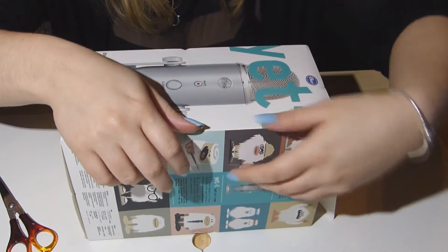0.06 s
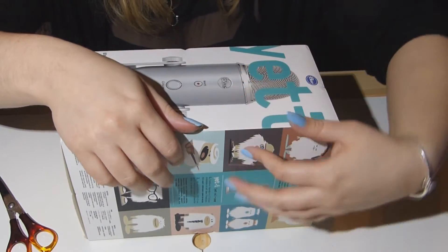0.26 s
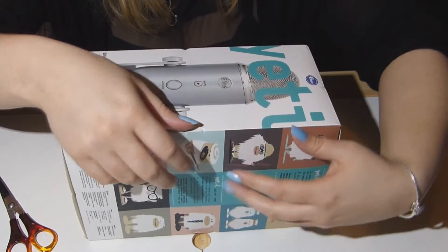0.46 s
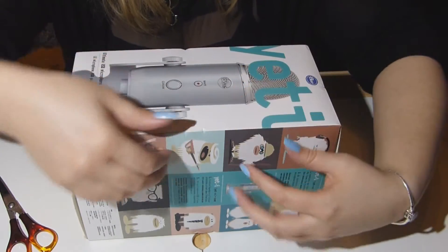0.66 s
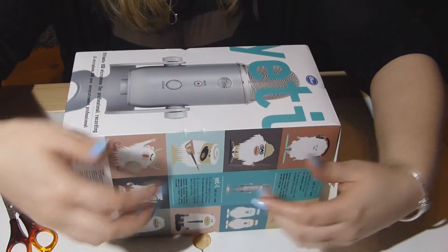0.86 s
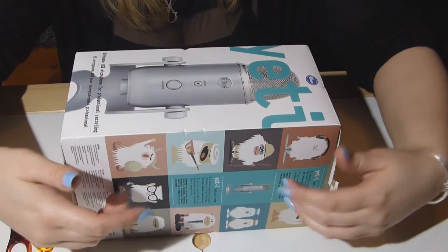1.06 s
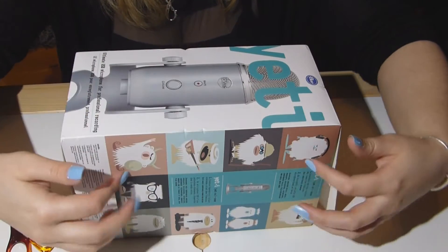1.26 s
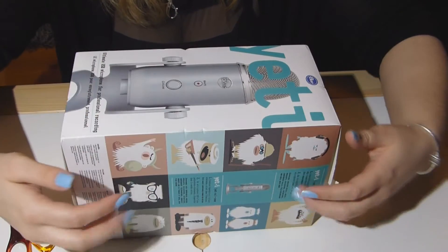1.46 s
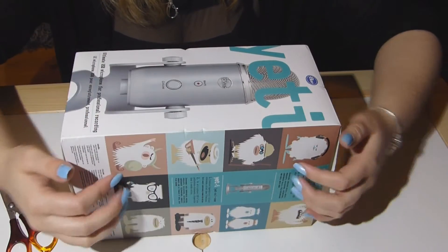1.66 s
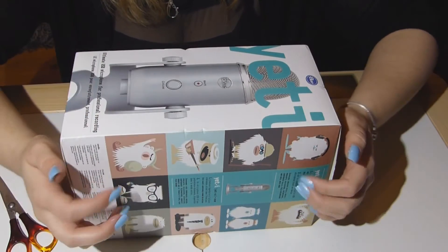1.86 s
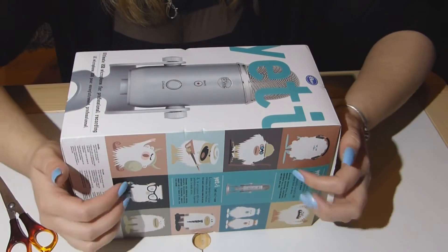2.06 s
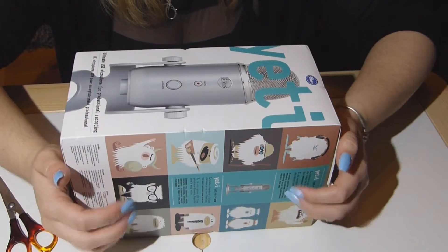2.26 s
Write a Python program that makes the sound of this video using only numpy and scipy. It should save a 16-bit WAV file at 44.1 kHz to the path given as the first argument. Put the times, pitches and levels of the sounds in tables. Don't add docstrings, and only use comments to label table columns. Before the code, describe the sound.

Long fingernails tap sharp, irregular clicks on a filled cardboard box in a quiet room

```python
import sys
import numpy as np
from scipy import signal
from scipy.fft import rfft, irfft, next_fast_len
from scipy.io import wavfile
from scipy.ndimage import uniform_filter1d

SR = 44100
rng = np.random.default_rng(int(sys.argv[2]) if len(sys.argv) > 2 else 0)


def inscribe(sig):
    pcm = np.round(np.clip(np.atleast_2d(sig).T, -1, 1) * 32767)
    wavfile.write(sys.argv[1], SR, pcm.astype(np.int16))


def invert_db(x):
    u = np.asarray(x, float) / 20
    return 10 ** u


N = 102488

# start in seconds, peak level in dB, hollow level in dB,
# panel level in dB, hollow pitch in Hz.
FIRST_TAPS = [
    (0.014, -26, -21, -12.5, 358),
    (0.034, -17.5, -26.5, -16, 295),
    (0.244, -26.5, -27.5, -12, 327),
    (0.25, -16.5, -30, -15.5, 292),
    (0.452, -33, -14, -6, 245),
    (0.501, -40.5, -25, -17, 234),
    (0.516, -20.5, -32, -15.5, 357),
    (0.58, -19.5, -23.5, -17.5, 264),
    (0.665, -23.5, -24, -13.5, 310),
    (0.682, -23, -32, -13, 298),
]
SECOND_TAPS = [(1.08, -31.5, -22.5, -14, 362), (1.174, -24.5, -22.5, -10.5, 307),
               (1.297, -17.5, -26, -15.5, 297), (1.432, -29, -22.5, -19, 351), (1.494, -19, -26, -14, 376),
               (1.605, -42, -15, -13, 362), (1.632, -31.5, -16.5, -10.5, 362),
               (1.684, -17, -23.5, -17.5, 371), (1.716, -15.5, -25.5, -19.5, 363),
               (1.868, -46, -24, -38, 275), (1.91, -24.5, -28.5, -18, 336), (1.981, -19, -23.5, -19, 334),
               (2.091, -20, -25.5, -14, 414), (2.112, -20, -25.5, -18, 367),
               (2.148, -18.5, -24.5, -13.5, 274), (2.278, -44.5, -34, -10, 343),
               (2.305, -25.5, -26.5, -16, 330)]
# start in seconds, length in seconds, level in dB, share of nail from 0 to 1.
SCUFF_STROKES = [(0, 0.016, -50, 0.7), (0.196, 0.085, -61, 0.66), (0.395, 0.022, -63, 0.54),
                 (0.679, 0.047, -49.5, 0.69), (0.732, 0.077, -57.5, 0.55), (0.784, .016, -52.5, 0.98),
                 (1.09, 0.017, -53, 0.78), (0.416, 0.018, -64.5, 0.97), (2.234, 0.0066, -55, .5),
                 (1.933, 0.0065, -68, 0.3), (1.11, 0.058, -60.5, 0.7), (1.257, 0.032, -59.5, 0.7),
                 (1.405, 0.038, -61, 0.7), (1.654, 0.082, -57, 0.5), (1.801, 0.034, -60.5, 0.69),
                 (1.823, 0.054, -53.5, 0.85), (1.973, 0.024, -52, 0.65), (2.003, 0.078, -62.5, 0.26),
                 (2.051, 0.06, -55, 0.95), (0.543, 0.088, -58.5, 0.95), (0.601, 0.073, -58, 0.92),
                 (1.056, 0.028, -70, 0.1), (2.168, 0.077, -63.5, 0.95), (2.289, 0.0065, -60.5, 0.03)]
# frequency in Hz, width in Hz, level in dB.
NAIL_MODES = [(2850, 760, -7), (3853, 269, 1), (4774, 660, -7.5), (5795, 724, -10), (6795, 1180, -13.5),
              (10200, 15000, -30.5)]
PANEL_MODES = [(655, 240, -5.5), (1026, 205, -4), (1210, 102, -0.5), (1687, 282, 0.5), (2250, 105, -5.5)]
# frequency in Hz, level in dB, T60 in seconds.
HOLLOW_MODES = [(228, 0, 0.089), (250, -0.5, 0.086), (294.1, 4.8, 0.059), (330, -3, 0.12),
                (367.5, -1.1, 0.073), (452.5, 2, 0.075)]
# frequency in Hz, level in dB.
SLANT_CURVE = [(300, -18), (700, 0.5), (1400, -14.5), (4000, -18.5), (9000, -9.5), (14000, -3)]
# frequency in Hz, T60 in seconds.
TABLE_DECAY = [(300, 0.032), (1500, 0.029), (5000, 0.031), (12000, 0.035)]
ROOM_DECAY = [(200, 0.41), (1000, .25), (4000, 0.24), (12000, 0.45)]
# frequency in Hz, level in dB.
ECHO_CURVE = [(150, -4), (400, 0.5), (1000, 3), (4000, -2.5), (8000, 1), (14000, 4.5)]
# frequency in Hz, left-right likeness from -1 to 1.
ECHO_LIKENESS = [(150, 0.64), (350, -1.1), (700, 1), (1400, 0.67), (3000, 0.56), (8000, 0.79),
                 (14000, 0.22)]
# frequency in Hz, level in dB per Hz.
HUM_CURVE = [(12, 9), (20, -12), (426, -2.5), (548, 1), (686, 2.5), (1100, 1), (2640, -15.5),
             (15000, -25.5), (16300, -60)]
# frequency in Hz, left-right likeness from -1 to 1.
HUM_LIKENESS = [(60, 0.46), (130, 0.28), (290, -0.19), (640, -0.82), (1410, -0.7), (3100, 0.092),
                (6820, 0.4), (15000, 0.49)]

PEAK_DB, PANEL_DB, HOLLOW_DB = -9.5, 10, 19
RISE_S, CHATTER_S, FALL_S = 0.00077, 0.0028, 0.0179
CHATTER_DB = 4
SPREAD_S = 0.002
BRIGHT_HZ, BRIGHT_DB_PER_DB = 7040, 0.98
SPOT_DB, SPOT_SHIFT = 1.5, 0.02
HOLLOW_RISE_S, REACH_DB_PER_OCTAVE = 0.0029, 22.5
TABLETOP_HZ, TABLETOP_DB, TABLETOP_T60_S = 155.7, -13, 0.29
HOLLOW_SEND_DB = -5
SCUFF_RISE, SCUFF_EDGE_S, SCUFF_GRAIN_DB = 0.25, 0.0037, 5
TABLE_DB, TABLE_DELAY_S = -5, 0.0017
ROOM_DB, ROOM_DELAY_S = -7, 0.0031
WALL_S, WALL_DB, WALL_RIGHT = 0.0118, -18, -0.24
LOW_CUT_HZ, TOP_HZ = 151, 12600
HUM_DB = -63


def taps():
    s, db, hollow_db, panel_db, pitch_hz = np.transpose(list(FIRST_TAPS) + list(SECOND_TAPS))[..., None]
    t = np.arange(SR // 8) / SR
    spot = rng.standard_normal((len(s), 17, 2))
    spot[:, 1, 0] = np.abs(spot[:, 1, 0])
    strikes = contact_forces(len(s), t)
    direct, side, sent = np.sqrt(CHATTER_S * SR) * nail_and_panel(strikes, db, panel_db, spot)
    hollow = invert_db(hollow_db + HOLLOW_DB) * hollow_and_tabletop(t, pitch_hz, spot[:, 11:])
    slant = filtered(side, lambda f: invert_db(along(SLANT_CURVE, f)))
    pair = (direct + hollow)[:, None] + slant[:, None] * np.array([[1], [-1]])
    level = invert_db(db + PEAK_DB)
    return placed(s[:, 0], level[..., None] * pair, level * (sent + invert_db(HOLLOW_SEND_DB) * hollow))


def contact_forces(count, t):
    contact = np.clip(t / RISE_S, 0, 1) * invert_db(-60 * np.clip(t - CHATTER_S, 0, None) / FALL_S)
    blow = np.tile(t == 0, (count, 1)).astype(float)

    def bending(f):
        turns = SPREAD_S * (2 * np.sqrt(4000 * (f + 600)) - f * np.sqrt(4000 / 20000))
        return np.exp(-2j * np.pi * turns)

    chatter, slant = energy(contact * rng.standard_normal((2, count, len(t))))
    rattle = filtered(blow, bending) + invert_db(CHATTER_DB) * chatter
    return np.array([evened(rattle, np.sqrt(contact)), slant, blow])


def nail_and_panel(force, db, panel_db, spot):
    def nail(f):
        sheen = invert_db(BRIGHT_DB_PER_DB * (db - db.max()) * f ** 2 / (f ** 2 + BRIGHT_HZ ** 2))
        return sheen * peaks(NAIL_MODES, spot)(f)

    panel = energy(filtered(force, peaks(PANEL_MODES, spot[:, 6:])))
    return energy(filtered(force, nail)) + invert_db(panel_db + PANEL_DB) * panel


def hollow_and_tabletop(t, pitch_hz, spot):
    total = invert_db(TABLETOP_DB - 60 * t / TABLETOP_T60_S) * np.sin(2 * np.pi * TABLETOP_HZ * t) * (1 - t / t[-1])
    for k, (hz, db, t60_s) in enumerate(HOLLOW_MODES):
        reach_db = -REACH_DB_PER_OCTAVE * np.abs(np.log2(hz / pitch_hz))
        level_db = db + reach_db + SPOT_DB * spot[:, k, :1]
        shifted_hz = hz * (1 + SPOT_SHIFT * spot[:, k, 1:])
        total = total + invert_db(level_db - 60 * t / t60_s) * np.sin(2 * np.pi * shifted_hz * t)
    return total * (1 - np.exp(-t / HOLLOW_RISE_S))


def scuffs():
    s, length_s, db, share = np.transpose(SCUFF_STROKES)[..., None]
    t = np.arange(SR // 8) / SR
    swell = 0.26 + t / (SCUFF_RISE * length_s)
    lift = (length_s - t) / SCUFF_EDGE_S + 0.5
    stroke = np.clip(np.minimum(swell, lift), 0, 1)
    grit = rng.standard_normal((3, len(s), len(t)))
    grain = invert_db(SCUFF_GRAIN_DB * unit(uniform_filter1d(grit[2], size=30)))
    spot = 2 * rng.standard_normal((len(s), 11, 2))
    nail = unit(filtered(grain * grit[0], peaks(NAIL_MODES, spot)))
    panel = unit(filtered(grain * grit[1], peaks(PANEL_MODES, spot[:, 6:])))
    rub = invert_db(db) * stroke * (np.sqrt(share) * nail + np.sqrt(1 - share) * panel)
    return placed(s[:, 0], rub[:, None], rub)


def peaks(modes, spot):
    def response(f):
        total = 0
        for k, (hz, width_hz, db) in enumerate(modes):
            c = hz * (1 + SPOT_SHIFT * spot[:, k, 1:])
            gain = (-1) ** k * invert_db(db + SPOT_DB * spot[:, k, :1])
            total = total + gain * 1j * f * width_hz / (c * c - f * f + 1j * f * width_hz)
        return total
    return response


def placed(times_s, sounds, sent):
    size = SR // 4
    table = invert_db(TABLE_DB) * tails(TABLE_DECAY, TABLE_DELAY_S, len(times_s), size // 2)
    echo = invert_db(ROOM_DB) * tails(ROOM_DECAY, ROOM_DELAY_S, len(times_s), size)
    echo[..., :size // 2] += table
    echo[..., round(WALL_S * SR)] += invert_db(WALL_DB) * np.array([1, WALL_RIGHT])
    coloured = filtered(sent, lambda f: invert_db(along(ECHO_CURVE, f)))
    wet = signal.fftconvolve(coloured[:, None], echo, axes=2)
    wet[..., :sounds.shape[-1]] += sounds
    out = np.zeros((2, N + SR))
    for s, w in zip(times_s, wet):
        out[:, round(s * SR):][:, :w.shape[1]] += w

    def band(f):
        return (1j * f / (LOW_CUT_HZ + 1j * f)) ** 3 / np.sqrt(1 + (f / TOP_HZ) ** 16)

    return filtered(out[:, :N], band)


def tails(decay, delay_s, count, size):
    hz, t, z = signal.stft(rng.standard_normal((count, 2, size)), SR, nperseg=128)
    fading = z * invert_db(-60 * t / along(decay, hz)[:, None])
    tail = signal.istft(fading, SR, nperseg=128)[1][..., :size]
    onset = np.clip(np.arange(size) / SR / delay_s - 1, 0, 1)
    tail = spread(tail, ECHO_LIKENESS) * onset
    return tail / np.sqrt(np.sum(tail ** 2, axis=(1, 2), keepdims=True) / 2)


def hum():
    pair = spread(rng.standard_normal((2, N)), HUM_LIKENESS, lambda f: invert_db(along(HUM_CURVE, f)))
    return invert_db(HUM_DB) * pair / np.sqrt(np.mean(pair.mean(axis=0) ** 2))


def spread(pair, likeness, gain=lambda f: 1):
    def response(f):
        turn = np.arccos(np.clip(along(likeness, f), -1, 1)) / 2
        return gain(f) * np.array([np.cos(turn), np.sin(turn)])

    out = filtered(pair, response)
    mid, side = out[..., 0, :], out[..., 1, :]
    return np.stack([mid + side, mid - side], axis=-2)


def evened(x, gate):
    for _ in range(4):
        z = rfft(x * gate)
        x = irfft(z / (np.abs(z) + 1e-9), x.shape[-1])
    return energy(x * gate)


def filtered(x, response):
    m = next_fast_len(x.shape[-1] + 1024)
    return irfft(rfft(x, m) * response(np.fft.rfftfreq(m, 1 / SR)), m)[..., :x.shape[-1]]


def along(points, hz):
    f, v = np.transpose(points)
    return np.interp(np.log(hz + 1), np.log(f + 1), v)


def energy(x):
    return x / np.sqrt(np.sum(x ** 2, axis=-1, keepdims=True) + 1e-20)


def unit(x):
    return x / np.sqrt(np.mean(x ** 2, axis=-1, keepdims=True) + 1e-20)


def scene():
    return taps() + scuffs() + hum()


def band_limit(x):
    return signal.sosfilt(signal.butter(12, 16480, fs=SR, output="sos"), x)


def record(dry):
    return band_limit(dry)


dry = scene()
out = record(dry)
inscribe(out)
```